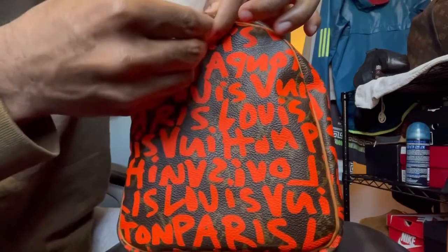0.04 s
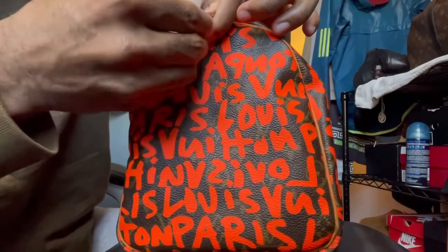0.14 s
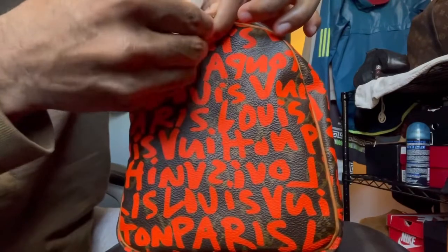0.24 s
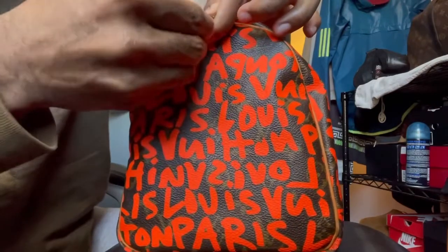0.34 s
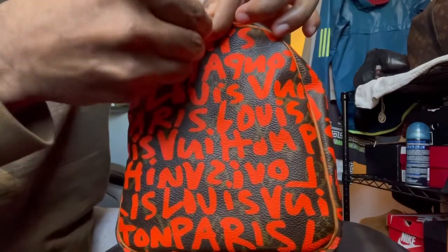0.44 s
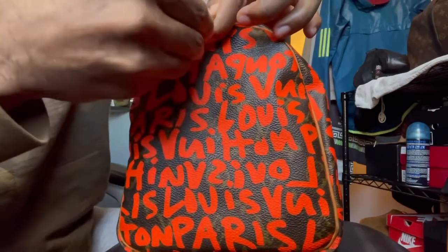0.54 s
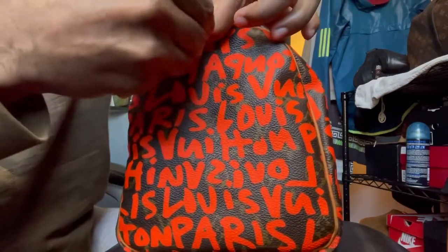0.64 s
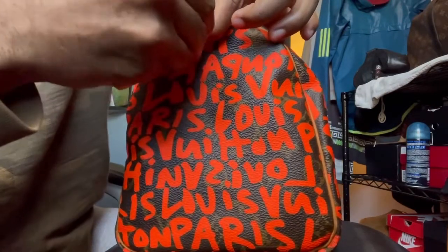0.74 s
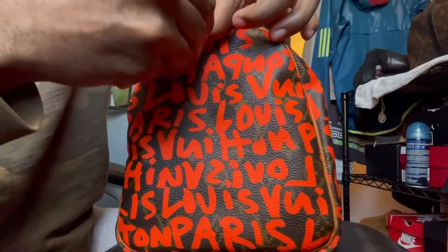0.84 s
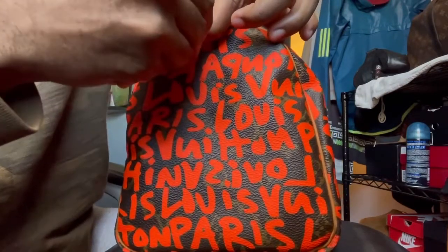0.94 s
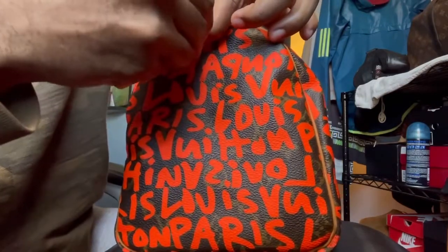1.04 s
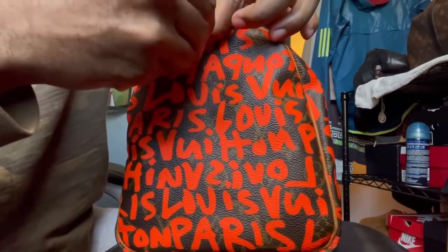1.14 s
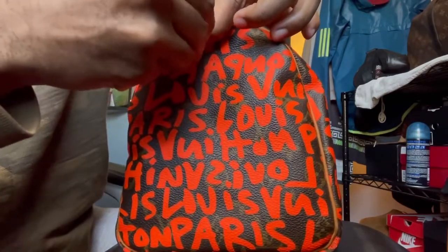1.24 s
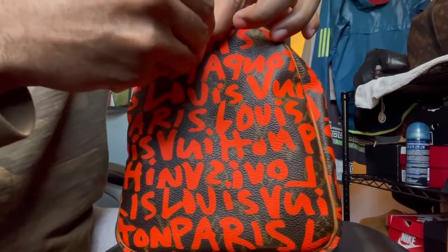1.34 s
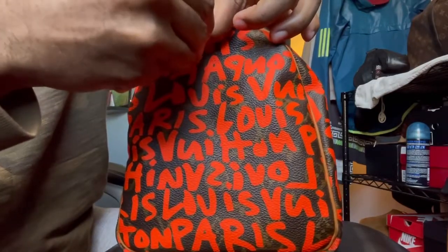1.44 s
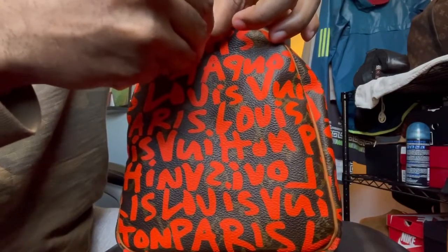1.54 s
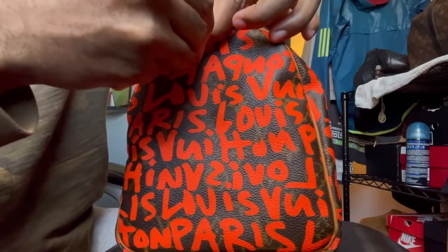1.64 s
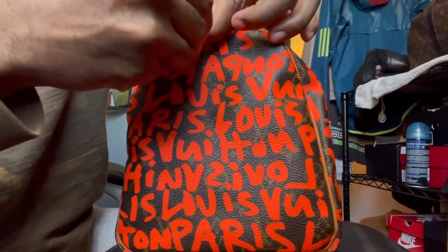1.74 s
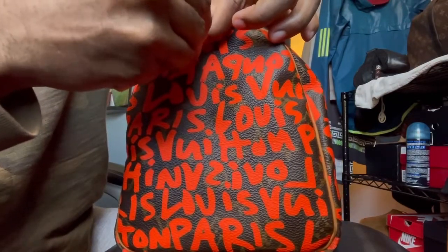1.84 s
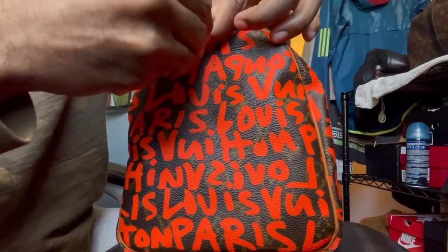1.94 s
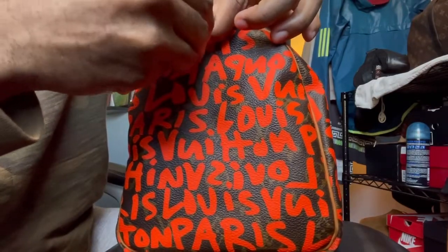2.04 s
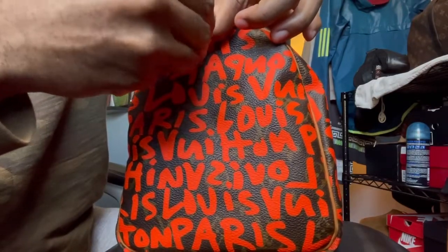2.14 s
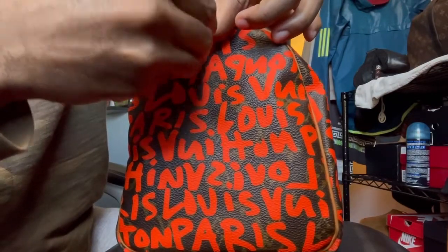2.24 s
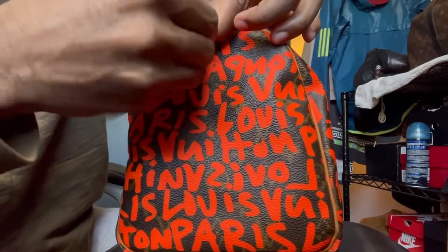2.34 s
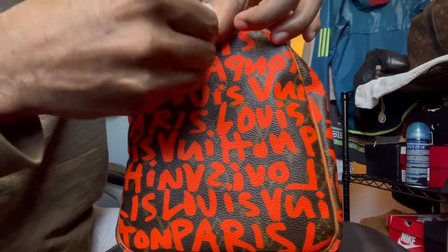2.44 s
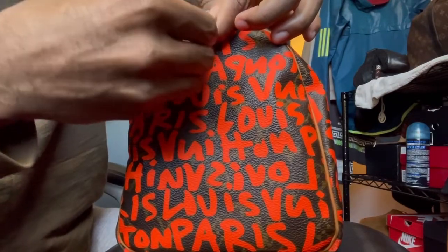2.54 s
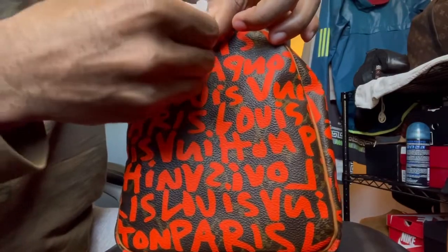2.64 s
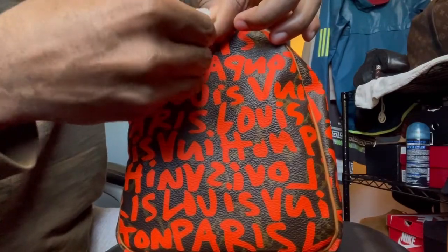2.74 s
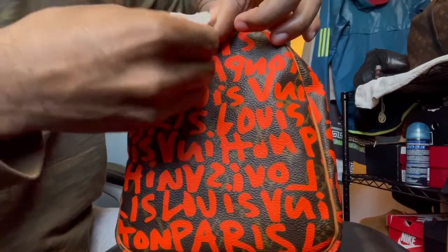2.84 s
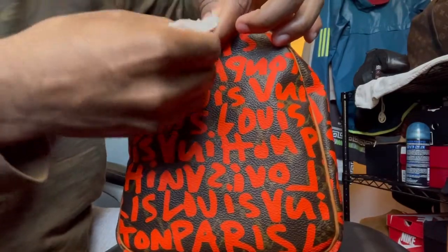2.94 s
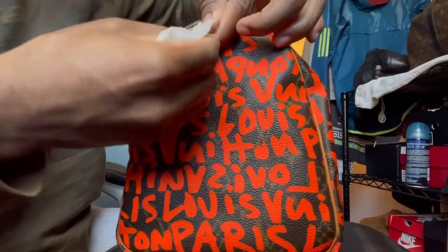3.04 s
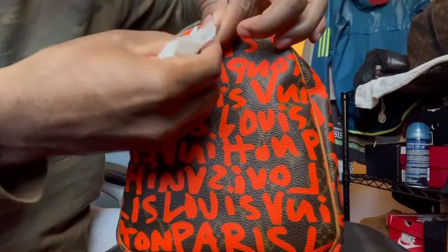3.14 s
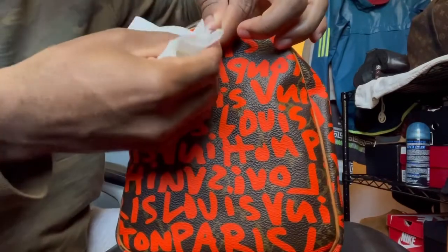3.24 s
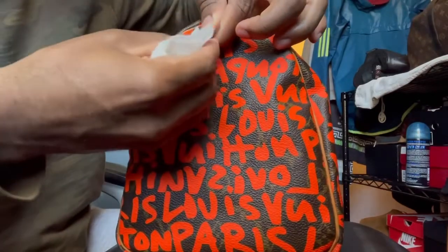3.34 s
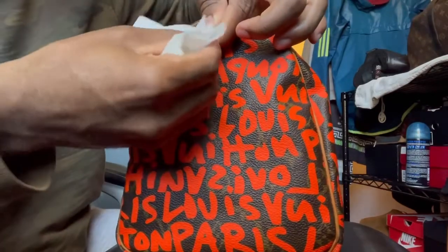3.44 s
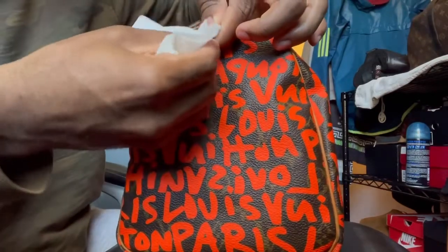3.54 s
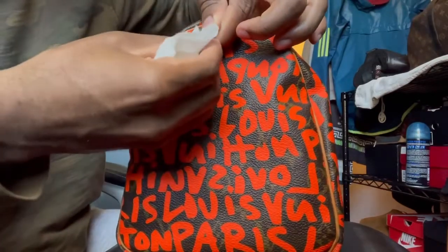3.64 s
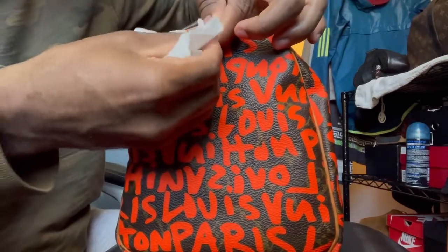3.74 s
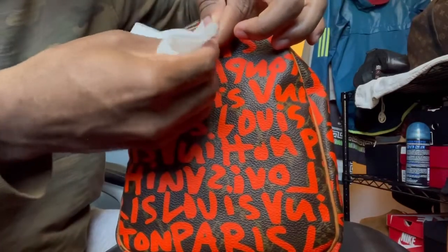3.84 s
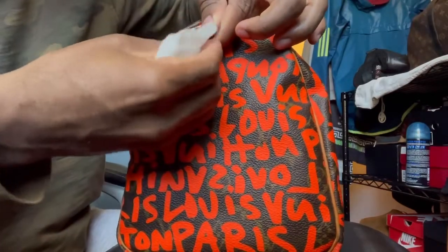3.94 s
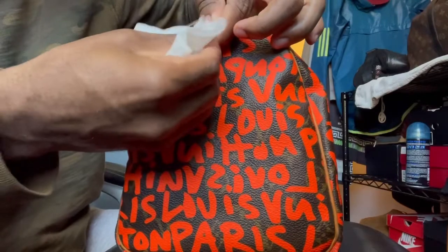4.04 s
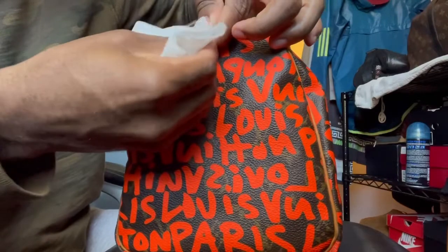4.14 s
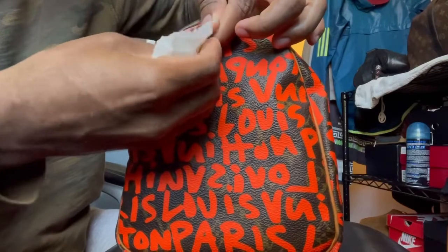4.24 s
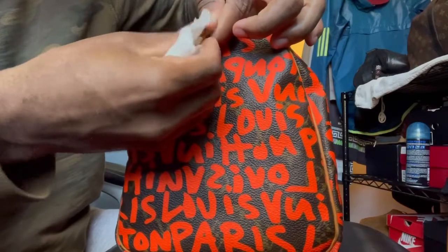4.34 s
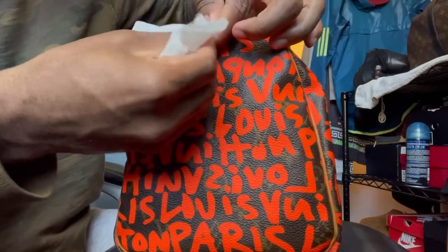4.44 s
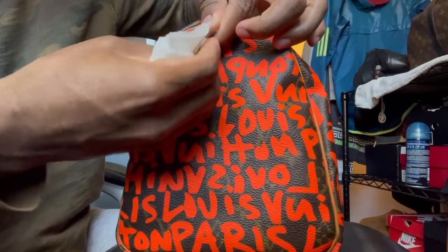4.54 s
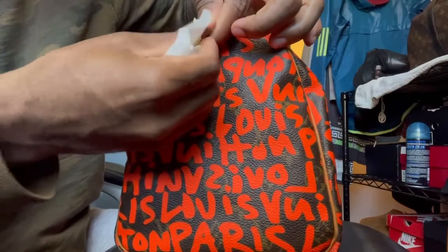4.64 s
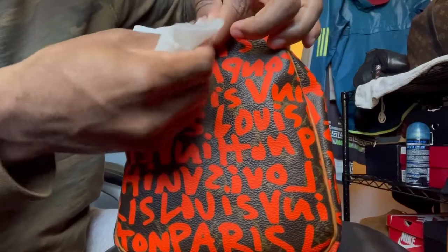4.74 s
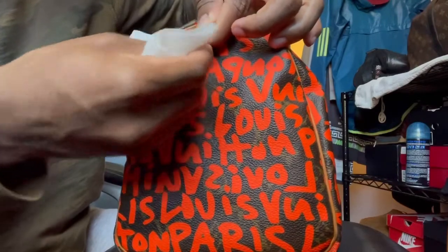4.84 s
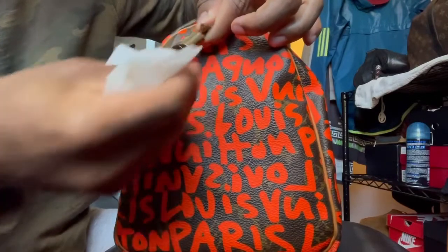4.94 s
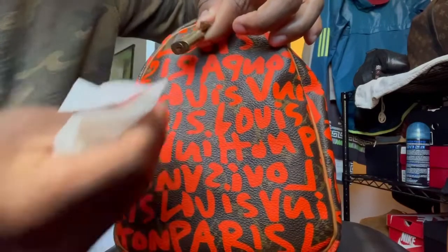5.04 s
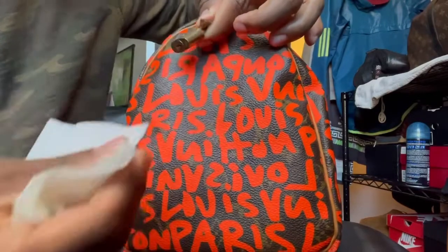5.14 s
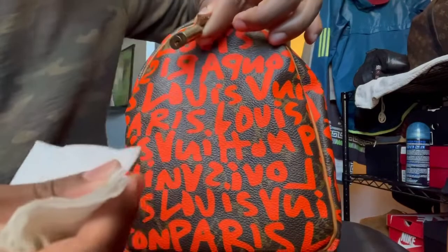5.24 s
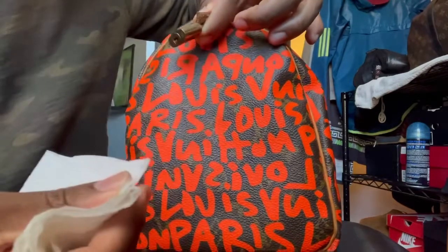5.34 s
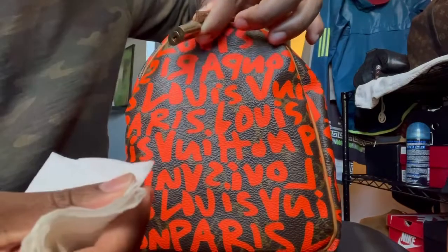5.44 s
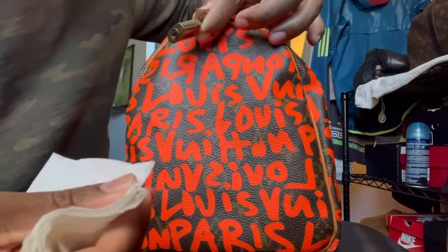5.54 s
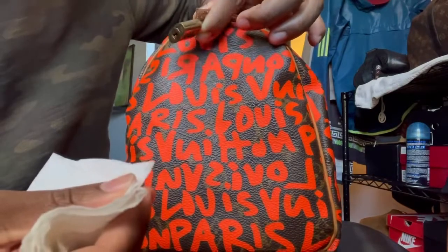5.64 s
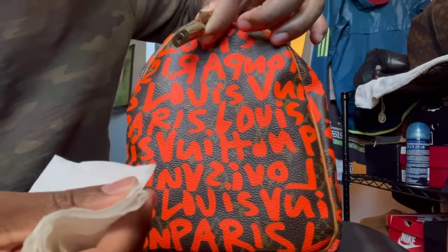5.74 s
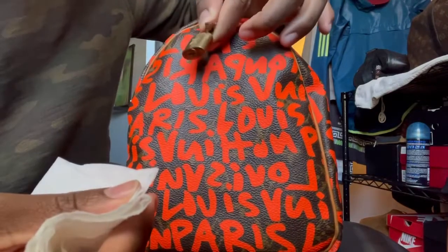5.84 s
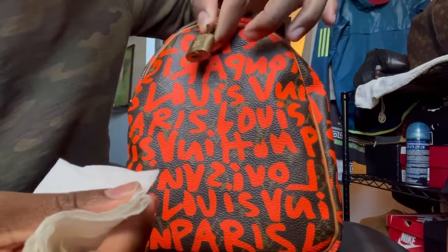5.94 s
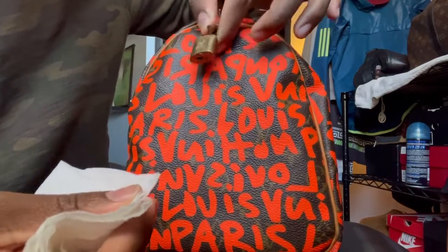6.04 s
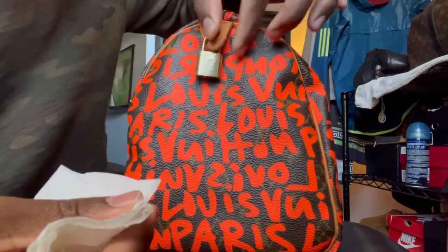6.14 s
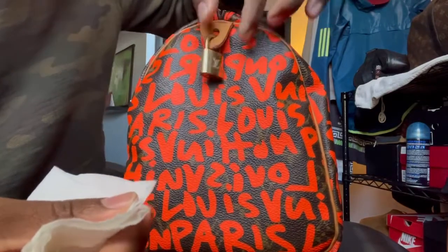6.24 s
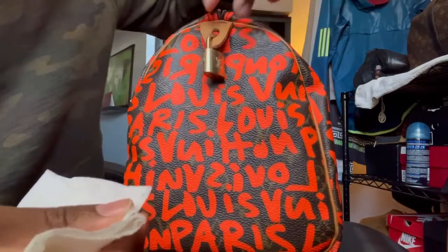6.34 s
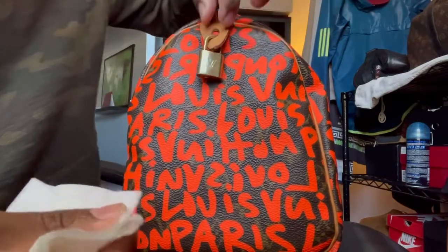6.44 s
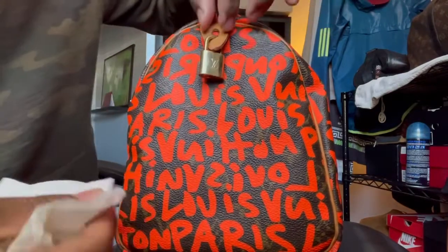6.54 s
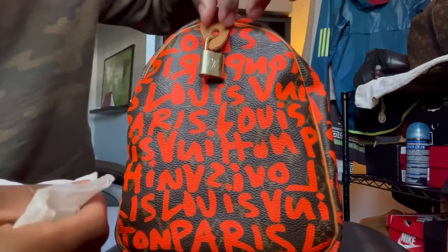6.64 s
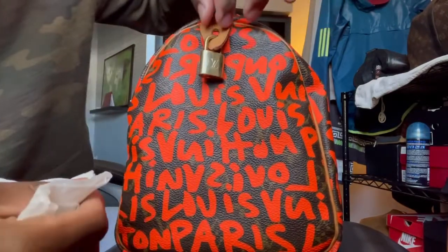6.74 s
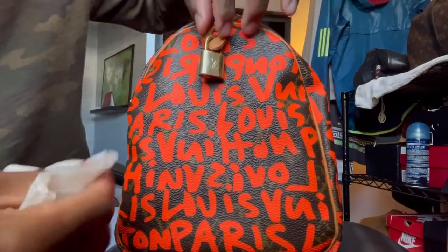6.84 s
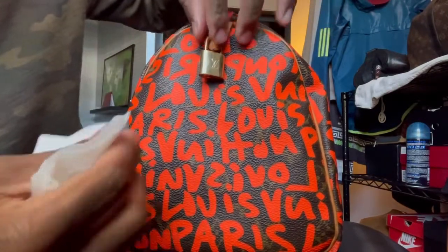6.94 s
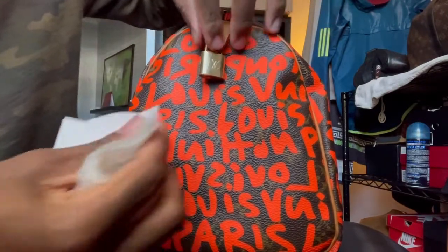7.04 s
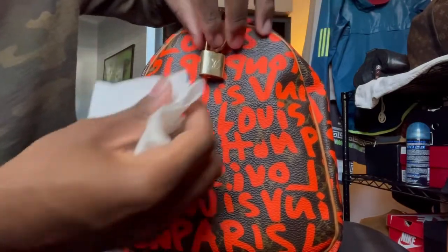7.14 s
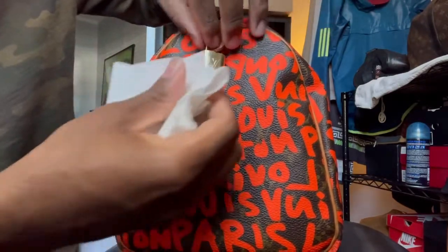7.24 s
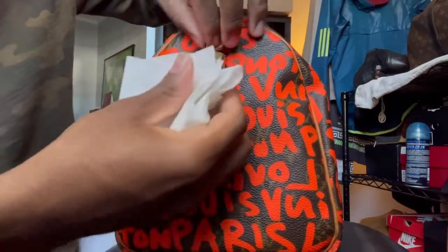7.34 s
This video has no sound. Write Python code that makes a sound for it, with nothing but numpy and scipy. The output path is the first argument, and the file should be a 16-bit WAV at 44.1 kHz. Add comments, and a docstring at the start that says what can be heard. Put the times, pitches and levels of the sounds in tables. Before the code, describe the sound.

Dry paper towel rubs in soft, bright, grainy strokes several times a second, then a padlock drops on a hollow bag with a thud and bounce.

```python
"""Soft, bright hisses come several a second: a dry paper towel polishes a small brass padlock.
The towel is grainy noise; the lock nudges a stiff, hollow bag, then drops on it with a thud and a bounce.
Knocks and zip clinks are short pushes into ringing modes; the hands swish away as two bands of noise.
A quiet room rumbles low under it all, with drones, a passing hum and a faint hiss.
Left and right differ in phase, sameness and level across the pitch range; a table top adds a bounce."""
import sys
import numpy as np
from scipy import signal
from scipy.fft import rfft, irfft, next_fast_len
from scipy.io import wavfile

SR = 44100
rng = np.random.default_rng(int(sys.argv[2]) if len(sys.argv) > 2 else 0)


def wav_record(signal):
    """Record a signal, one row per channel, as 16-bit PCM in the file named by sys.argv[1]."""
    frames = np.transpose(np.atleast_2d(signal))
    bounded = np.clip(frames, -1, 1)
    # unit amplitude maps onto the largest positive 16-bit level
    quanta = np.round(bounded * 32767).astype(np.int16)
    wavfile.write(sys.argv[1], SR, quanta)


N = 326337  # length of the sound in samples


def from_db(db):
    """Turn decibels into a plain multiplier."""
    return 10 ** (np.asarray(db) / 20)


def rms_one(x):
    """Scale a signal to an average strength (RMS) of 1."""
    return x / np.sqrt(np.mean(x ** 2) + 1e-20)


def in_time(rows):
    """Draw straight lines between the rows of a table whose first column is time."""
    times, *columns = np.transpose(rows)
    return [np.interp(np.arange(N) / SR, times, column) for column in columns]


def drift(rate_hz):
    """Slow random wandering of spread 1: noise at every 40th sample, smoothed twice."""
    keep = np.exp(-2 * np.pi * rate_hz * 40 / SR)
    noise = rng.standard_normal(N // 40 + 2002)
    slow = signal.lfilter([1], [1, -2 * keep, keep * keep], noise)[2000:]  # skip the start-up
    return np.interp(np.arange(N) / 40, np.arange(len(slow)), rms_one(slow))


def ring(x, hz, t60):
    """Let a signal set off a dying sine; a click of 1 starts it at height 1, and it falls 60 dB in t60 s."""
    shrink = from_db(-60 / (t60 * SR))
    turn = 2 * np.pi * hz / SR
    return signal.lfilter([0, np.sin(turn)], [1, -2 * shrink * np.cos(turn), shrink * shrink], x + 1e-18)


FOLD_HZ, FOLD_OCTAVES = 4340, 0.16  # the folded towel colours some strokes around this pitch


def banded(white, spectrum, patchy_db, rate_hz, tilt=0, fold_db=0):
    """Colour noise in third-octave bands, each flickering by itself; neighbours use unrelated noise."""
    table_hz, table_db = np.transpose(spectrum)
    octaves = np.log2(table_hz[-1] / table_hz[0])
    edges = table_hz[0] * 2 ** np.arange(0, octaves + 1 / 3, 1 / 3)
    out = 0
    for k, (low, high) in enumerate(zip(edges, edges[1:])):
        hz = np.sqrt(low * high)
        level_db = np.interp(np.log(hz), np.log(table_hz), table_db)
        fold_shape = np.exp(-(np.log2(hz / FOLD_HZ) / FOLD_OCTAVES) ** 2)
        colour_db = tilt * np.log2(hz / 5000) + fold_db * fold_shape
        gain = from_db(level_db + colour_db + patchy_db * drift(rate_hz))
        band = signal.butter(3, [low, high], "band", fs=SR, output="sos")
        out = out + gain * signal.sosfilt(band, white[k % 2])
    return out


# Towel strokes and rustles of the hands: (middle [s], nominal length [s], friction level [dB])
TOWEL_STROKES = [(-0.005, 0.068, -62.5), (0.147, 0.061, -66.5), (0.326, 0.074, -75.5),
                 (0.422, 0.065, -69.5), (0.583, 0.11, -77), (0.712, 0.03, -72), (0.757, 0.044, -71.5),
                 (0.864, 0.052, -72), (1.039, 0.048, -77.5), (1.307, 0.044, -74), (1.428, 0.056, -77),
                 (1.575, 0.049, -83.5), (1.708, 0.056, -70.5), (1.838, 0.072, -75.5), (1.993, 0.041, -81.5),
                 (2.158, 0.065, -72.5), (2.284, 0.1, -77), (2.347, 0.053, -71.5), (2.465, 0.052, -69.5),
                 (2.589, 0.053, -60.5), (2.708, 0.083, -67), (2.897, 0.079, -72.5), (3, 0.09, -67.5),
                 (3.136, 0.078, -64), (3.236, 0.095, -65.5), (3.389, 0.06, -63), (3.474, 0.059, -60),
                 (3.55, 0.12, -66), (3.671, 0.082, -60.5), (3.782, 0.08, -58.5), (3.855, 0.085, -64),
                 (4.029, 0.14, -58), (4.183, 0.084, -61.5), (4.301, 0.073, -57.5), (4.402, 0.083, -57),
                 (4.498, 0.091, -61.5), (4.616, 0.098, -60), (4.713, 0.069, -57.5), (4.812, 0.068, -62.5),
                 (4.937, 0.11, -73.5), (5.112, 0.22, -79.5), (5.256, 0.11, -87), (5.436, 0.4, -89.5),
                 (6.1, 0.16, -77), (6.234, 0.071, -84), (6.452, 0.027, -76.5), (6.49, 0.043, -81.5),
                 (6.58, 0.14, -80), (6.797, 0.033, -81), (6.836, 0.043, -70), (6.902, 0.13, -70),
                 (7.047, 0.18, -69.5), (7.118, 0.12, -67), (7.258, 0.15, -65.5), (7.37, 0.085, -64)]
# Colour of the rubbing paper: (frequency [Hz], level per Hz [dB])
PAPER_COLOUR = [(500, 5.5), (900, -6.5), (1500, 3), (2200, 1), (3200, 5.5), (4200, 4), (5300, 1), (7500, 9),
                (9500, 11.5), (11500, 5.5), (14500, 10), (16000, 0)]
# Colour of the rubbing at FIRM_DB as the grip on the towel changes:
# (time [s], slope [dB per octave], fold level [dB], extra grit [dB], grit slope [dB per octave])
TOWEL_GRIP = [(0, -4, 6.5, 8, -1), (1.2, -6, 7, 1, -9), (2.6, -4, 8, 8, -2.5), (3.0, -5, 3, 1.5, -9),
              (3.3, -3.5, 5.5, 6, 0.5), (3.7, -4, 3, 0.5, -11), (4.1, -3.5, 5, 0.5, -1),
              (4.45, -5.5, 3, -2, -6), (4.75, -5, 1, -2, -4), (5.4, -9.5, 3, 15, -14),
              (6.1, 1, 5, 9.5, -19), (6.6, -2.5, 2, 10, -16), (6.78, -5, -5, 14, -4), (6.85, -4, -9, -2, 7),
              (6.95, 0, 21, -3, 3), (7.06, -4.5, -3, -3, 3), (7.09, 0, 6, 7, 7), (7.13, -3.5, 4, 3.5, 5),
              (7.18, -4, 2, 6, -13), (7.28, -4.5, 2, 4, -8), (7.4, -3.5, 3, 0, 2)]
# Stiff canvas wall of the bag, also struck by the knocks: (frequency [Hz], level [dB], time to fall 60 dB [s])
CANVAS_WALL = [(430, -4, .02), (625, -.5, 0.016), (1060, 1.5, 0.008), (1620, 1, 0.005), (2210, 1, 0.007),
               (2760, 2, 0.006)]
# How strongly the coarse catches drive the four upper canvas modes: (level [dB])
GRIT_ON_WALL_DB = [-0.5, 3.5, -1.5, 3.5]
# Harder strokes are brighter: rise of the slope per dB of friction, and random scatter of the slope
FIRM_DB, BRIGHTER_PER_DB, BRIGHTNESS_SCATTER = -58.5, 0.1423, 0.99
FOLD_PER_DB = -0.04  # the fold stands out more in light strokes
SNAPS_PER_S, SNAP_DB, SNAP_S = 600, -4, .0005  # single fibres snap free; the last is their decay
GRIT_PER_S, GRIT_DB = 900, -14.5  # coarse catches that shake the wall of the bag
FLUTTER_DB, FLUTTER_HZ = 1.5, 30  # the towel judders within a stroke: spread and fastest wandering


def towel():
    """Paper fibres catch and slip: grainy, paper-coloured noise swells with each stroke and shakes the bag."""
    middle, length, friction_db = np.transpose(TOWEL_STROKES)
    grip_times, *grip = np.transpose(TOWEL_GRIP)
    slope, fold_db, *_ = [np.interp(middle, grip_times, column) for column in grip]
    firmness_db = friction_db - FIRM_DB
    scatter = BRIGHTNESS_SCATTER * rng.standard_normal(len(middle))
    brightness = slope + BRIGHTER_PER_DB * firmness_db + scatter
    fold_db = fold_db + FOLD_PER_DB * firmness_db

    # speed peaks mid-stroke and falls away where the hand turns
    t = np.arange(0, N + 64, 64) / SR
    away = np.abs(t[:, None] - middle) / (length / 2)
    power = from_db(friction_db - 5.04 * away ** 1.81) ** 2 + 1e-14
    total = power.sum(1)
    # overlapping strokes share their colour by strength
    curves = np.sqrt(total), power @ brightness / total, power @ fold_db / total
    level, tilt, fold = [np.interp(np.arange(N) / SR, t, curve) for curve in curves]

    grain_db = 1.1 * np.minimum(rng.exponential(1, N), 6) + 0.26 * drift(91)  # catches clump
    snaps = (rng.random(N) < SNAPS_PER_S / SR) * rng.exponential(1, N)
    snaps = signal.lfilter([1], [1, -np.exp(-1 / (SNAP_S * SR))], snaps)
    roughness = rms_one(from_db(grain_db)) + from_db(SNAP_DB) * snaps
    white = roughness * rng.standard_normal((2, 2, N))
    hiss = banded(white, PAPER_COLOUR, patchy_db=1.7, rate_hz=18.6, tilt=tilt, fold_db=fold)

    *_, grit_db, grit_slope = in_time(TOWEL_GRIP)
    grit = 0
    for (hz, _, t60), mode_db in zip(CANVAS_WALL[2:], GRIT_ON_WALL_DB):
        catches = (rng.random((2, N)) < GRIT_PER_S / SR) * rng.laplace(size=(2, N))
        gain_db = mode_db + grit_slope * np.log2(hz / 1600) + 2.0 * drift(15)
        # rubbing lets the wall ring longer than a knock does
        grit = grit + from_db(gain_db) * rms_one(ring(catches, hz, 2.2 * t60))
    level = level * from_db(FLUTTER_DB * drift(FLUTTER_HZ))
    return level * (from_db(-2.5) * hiss + from_db(GRIT_DB + grit_db) * grit)


# Lock against bag, levels before the fixed boosts below: (time [s], brass tick level [dB],
# wall slap level [dB], hollow thud level [dB], slap slope above 1 kHz [dB per octave],
# tick slope [dB per octave]); loudest are the drop and its bounce
LOCK_KNOCKS = [(0.3949, -70, -55, -65, -3, 4), (0.7066, -72, -48.5, -47, -5.5, -9),
               (0.727, -74, -65, -57, 8, -3), (0.756, -62, -56.5, -50, 3.5, -10),
               (1.05, -67, -49, -46.5, -12, -8), (1.435, -75, -61.5, -51.5, -6, -3),
               (1.824, -83, -63, -57, -18, -8), (2.1907, -79, -60, -56, -10, -6),
               (2.569, -55, -51, -55, -10, -3), (6.113, -34, -32.5, -20.8, -0.5, -0.4),
               (6.214, -49, -41, -38, -19, -1), (6.4478, -68, -66, -60, 0, -4),
               (6.832, -76, -57, -52, -17, -6), (7.318, -69, -57.5, -51, -2, 6),
               (7.343, -72, -45.5, -41, -8, 0.1)]
# Brass held in the fingers: (frequency [Hz], level [dB], time to fall 60 dB [s])
BRASS_LOCK = [(3600, -2, .003), (4200, -1, .002), (5200, -3, .0015), (6200, 0, .0015), (7300, -1, .0015),
              (9500, 1, .0012), (14500, -4, .0008)]
# Air and walls of the hollow bag: (frequency [Hz], level [dB], time to fall 60 dB [s])
BAG_HOLLOW = [(68, -9, .1), (119, 1, .02), (180, -.5, .05), (257, -4, .055), (324, -11, .022),
              (290, -23, .16), (170, -21, .2)]
CONTACT_S = .0008  # how fast the rattle of each touch dies away


def knocks():
    """Each contact ticks on the brass, slaps the canvas, and a moment later pushes the hollow."""
    times, tick_db, slap_db, thud_db, slap_slope, tick_slope = np.transpose(LOCK_KNOCKS)
    at = np.round(times * SR).astype(int)
    after, lasts = np.arange(400), SR * CONTACT_S  # both in samples
    # brass rattles while it touches; the first touch is the hardest
    chatter = rng.standard_normal((len(at), 400)) * np.exp(-after / lasts)
    chatter[:, 0] = 15
    chatter /= np.linalg.norm(chatter, axis=1, keepdims=True)
    # the canvas gets one brief push that dies without rattling
    press = np.exp(-after / (lasts / 8))
    press /= press.sum()

    out = np.zeros(N)
    tick = BRASS_LOCK, tick_db + 11.0, tick_slope, 5000, chatter
    slap = CANVAS_WALL, slap_db + 7.0, slap_slope, 1000, press
    for modes, level_db, slope, middle_hz, touch in (tick, slap):
        vary_db = 1.5 * rng.standard_normal((len(at), len(modes)))
        for k, (hz, mode_db, t60) in enumerate(modes):
            slope_db = slope * np.log2(max(hz, 1000) / middle_hz)
            gain = from_db(level_db + mode_db + slope_db + vary_db[:, k])
            force = np.zeros(N)
            force[at[:, None] + after] = gain[:, None] * touch
            out += ring(force, hz, t60) * (-1) ** k

    push = np.zeros(N)
    push[at + round(.0012 * SR)] = from_db(thud_db + 10.5)  # 1.2 ms after the touch
    # neighbouring modes start opposed, so the thud swells before it dies
    for k, (hz, mode_db, t60) in enumerate(BAG_HOLLOW):
        out += ring(push, hz, t60) * from_db(mode_db) * (-1) ** k
    return out


# Airy swishes as the hands draw away: (middle [s], nominal length [s], level [dB])
HAND_SWISHES = [(5.15, 0.19, -79), (6.045, 0.15, -84.5)]
# Their two bands of air noise: (frequency [Hz], nominal width [Hz], level [dB])
AIR_BANDS = [(5830, 710, -3), (11800, 1100, -1)]


def swishes():
    """Moving hands stir the air: smooth noise in two bands, swelling and fading."""
    t = np.arange(N) / SR
    level = sum(from_db(db - 2.3 * ((t - s) / (length / 2)) ** 2) for s, length, db in HAND_SWISHES)
    air = 0
    for hz, width_hz, db in AIR_BANDS:
        air = air + from_db(db) * rms_one(ring(rng.standard_normal((2, N)), hz, 3.0 / width_hz))
    return level * air


# A small metal part of the zip clinks: (time [s], strike level [dB], lean to 2nd, 4th and 6th mode [dB])
ZIP_CLINKS = [(5.0904, -60, 4), (5.4785, -71.5, 5), (6.722, -58.5, -1), (6.995, -56, 3)]
# Modes of that metal part: (frequency [Hz], level [dB], time to fall 60 dB [s])
ZIP_MODES = [(2200, -1, .008), (2750, -2, .008), (3220, -4, 0.008), (3800, -8, .005), (4850, -8, .005),
             (5500, -5, 0.0056), (7600, -8, .003)]


def clinks():
    """One click sets short metal modes ringing; where it is struck favours every other mode."""
    times, strike_db, lean_db = np.transpose(ZIP_CLINKS)
    at = np.round(times * SR).astype(int)
    out = np.zeros(N)
    for k, (hz, mode_db, t60) in enumerate(ZIP_MODES):
        force = np.zeros(N)
        force[at] = from_db(strike_db + mode_db - lean_db * (-1) ** k)
        out += ring(force, hz, t60) * (-1) ** k
    return out


ECHO_T60_S, ECHO_DB = 0.072, -33  # time to fall 60 dB, and starting level


def echoes(x):
    """Walls return each blow as two unrelated dying noise tails, thinned at both ends of the range."""
    t = np.arange(SR // 2) / SR
    fade = from_db(ECHO_DB - 60 * t / ECHO_T60_S) * np.minimum(t / 0.00059, 1)
    tail = rng.standard_normal((2, len(t))) * fade
    band = signal.butter(1, [500, 7000], "band", fs=SR, output="sos")
    thin = signal.sosfilt(band, x)
    return signal.fftconvolve(thin[None], tail, axes=1)[:, :N]


# The room swells and sinks: (time [s], rumble level before a 3 dB boost [dB], deep drone level [dB])
ROOM_LEVELS = [(0.0, -56, -61), (0.47, -55, -58), (1.03, -55.5, -59.5), (1.32, -56, -55.5),
               (1.46, -56, -62), (2.78, -54, -63.5), (3.46, -52, -55.5), (3.96, -52, -62.5),
               (4.31, -52, -55.5), (4.76, -51, -60), (5.23, -53.5, -57.5), (6.02, -53, -58),
               (6.39, -54, -59.5), (7.4, -56.5, -56)]
# Colour of the ventilation rumble: (frequency [Hz], relative level per Hz [dB])
RUMBLE_COLOUR = [(22, -16.5), (40, -12), (80, -1.5), (135, -11), (180, -8), (230, -9), (270, -13.5),
                 (350, -15.5), (600, -20), (700, -24.5), (800, -39.5), (900, -25), (1100, -31.5),
                 (1400, -38), (1750, -49.5), (2600, -51.5), (4000, -54)]
# Standing waves of the room: (frequency [Hz], nominal width [Hz], level against the deep drone level [dB])
ROOM_DRONES = [(57.6, 6.8, 3), (102, 16.3, 2.5)]
# Hum that rises out of the rumble: (time [s], level [dB])
HUM_LEVEL = [(0, -62), (1.2, -64.5), (3.9, -80), (4.25, -56.5), (4.45, -60), (4.8, -54.5), (5.0, -54),
             (5.3, -64), (5.6, -58), (6.1, -66), (6.7, -65.5), (7.4, -72)]
# Tones of the hum: (frequency [Hz], nominal width [Hz], level against the hum level [dB])
HUM_TONES = [(146.2, 27, -10), (178.7, 12, -3.5), (222.9, 14, -3), (297.8, 13, 0.5)]
DRONE_WAVER_DB, DRONE_WAVER_HZ = 3, 5.4  # spread and fastest wandering of the drones
HISS_DB = -84.5


def room():
    """Patchy ventilation rumble, narrow drones that come and go, a passing hum and the microphone's hiss."""
    rumble_db, deep_db = in_time(ROOM_LEVELS)
    hum_db, = in_time(HUM_LEVEL)
    rumble = banded(rng.standard_normal((2, 2, N)), RUMBLE_COLOUR, patchy_db=2.0, rate_hz=8.2)
    out = from_db(rumble_db + 3.0) * rms_one(rumble)
    for hz, width_hz, over_db in ROOM_DRONES:
        drone_db = deep_db + over_db + DRONE_WAVER_DB * drift(DRONE_WAVER_HZ)
        out += from_db(drone_db) * rms_one(ring(rng.standard_normal((2, N)), hz, 5.4 / width_hz))
    for hz, width_hz, over_db in HUM_TONES:
        tone = rms_one(ring(rng.standard_normal((2, N)), hz, 4.0 / width_hz))
        out += from_db(hum_db + over_db) * tone
    return out + from_db(HISS_DB) * rng.standard_normal((2, N))


# Stereo table, stepped in the treble: (frequency [Hz], phase of the right channel [radians],
# share it has in common with the left [0-1], level of the right over the left [dB])
STEREO_TABLE = [(60, 0, .85, 1), (300, -.3, .8, 1), (480, .3, .7, 1.5), (680, 1.5, .4, 1.5),
                (1200, .8, .6, 2.5), (3000, 3.0, .6, 3), (4700, 3.6, .55, 4), (5900, 6.3, .4, 2),
                (7300, 4.2, .6, .5), (8200, 3.2, 1, 0), (9500, 3.1, 1, 0), (10700, .1, .97, 0),
                (12200, 0, 1, 0), (13600, -3.1, 1, 0), (15000, -3.2, 1, 0), (15400, -4.8, .6, 0)]
# Added to it for blows on the bag: (frequency [Hz], level [dB], phase [radians])
BAG_STEREO = [(100, 5, 0), (180, 4, -.3), (270, -3, -.1), (430, 1, 1.3), (635, 8, .5), (1100, 2.5, -.3),
              (1640, -1, .3), (2200, 1, 0), (3200, -1, -.2), (3600, 0, .7), (4400, 1.5, .5), (5400, -2, .3),
              (6200, 1, .6), (7800, 1.5, .2), (9500, 0, -.4), (13000, 1, .2)]
# Bounce off the table top: delay [s], share of the sound, and the range it reflects [Hz]
TABLE_DELAY_S, TABLE_SHARE, TABLE_LOW_HZ, TABLE_HIGH_HZ = 0.00184, 0.25, 520, 3360


def stereo(shared, other, blow=False):
    """Both channels get a table bounce; the right is a phase-shifted left plus an unrelated share."""
    size = next_fast_len(N)
    hz = np.fft.rfftfreq(size, 1 / SR)
    at, *columns = np.transpose(STEREO_TABLE)
    phase, common, level_db = [np.interp(hz, at, column) for column in columns]
    if blow:
        at, bag_db, bag_phase = np.transpose(BAG_STEREO)
        common = np.ones(len(hz))  # a blow has no unrelated share
        level_db = level_db + np.interp(hz, at, bag_db)
        phase = phase + np.interp(hz, at, bag_phase)
    reflects = TABLE_SHARE / (1 + (TABLE_LOW_HZ / (hz + 1)) ** 4) / (1 + (hz / TABLE_HIGH_HZ) ** 4)
    table = 1 + reflects * np.exp(-2j * np.pi * hz * TABLE_DELAY_S)
    left = rfft(shared, size)
    right = common * left * np.exp(1j * phase) + np.sqrt(1 - common ** 2) * rfft(other, size)
    # half of the level difference goes to each channel
    both = [left * from_db(-level_db / 2), right * from_db(level_db / 2)]
    return irfft(both * table, size)[:, :N]


def scene():
    """Spread sounds get an unrelated share; a blow is only filtered, and a zip clink is also added in step."""
    blows, zip_parts = knocks(), clinks()
    spread = towel() + swishes() + room() + echoes(blows + zip_parts)
    return stereo(*spread) + stereo(blows, blows, blow=True) + zip_parts


CUTOFF_HZ = 15760


def record(dry):
    """A steep low-pass filter cuts the very top of the treble."""
    low_pass = signal.ellip(12, .5, 60, CUTOFF_HZ, fs=SR, output="sos")
    return signal.sosfilt(low_pass, dry)


dry = scene()
out = record(dry)
wav_record(out)
```